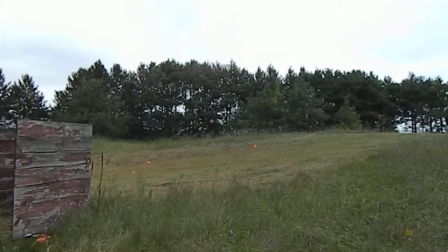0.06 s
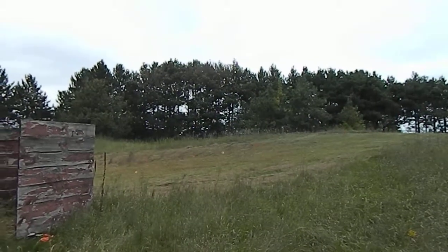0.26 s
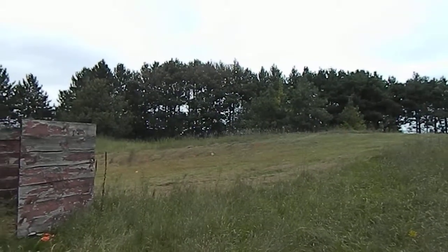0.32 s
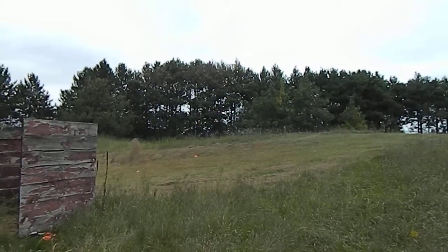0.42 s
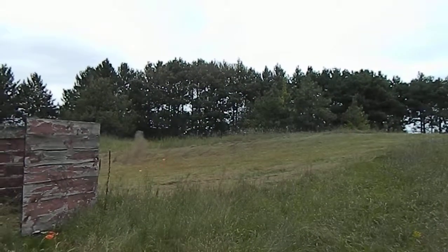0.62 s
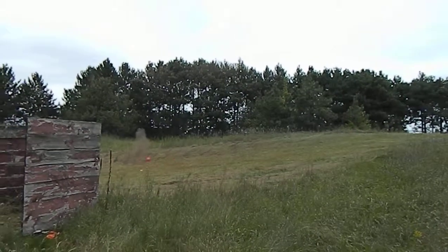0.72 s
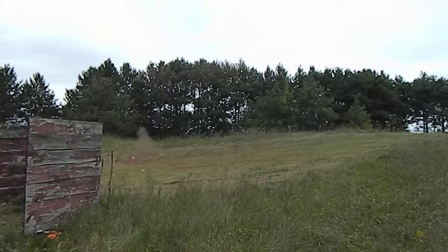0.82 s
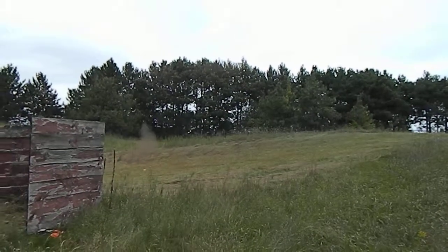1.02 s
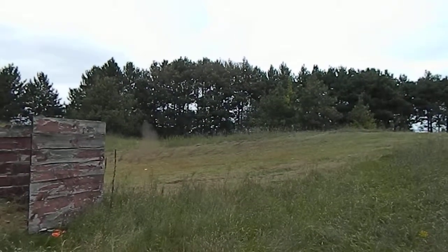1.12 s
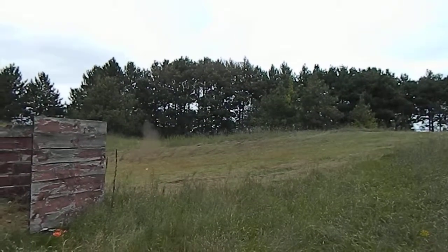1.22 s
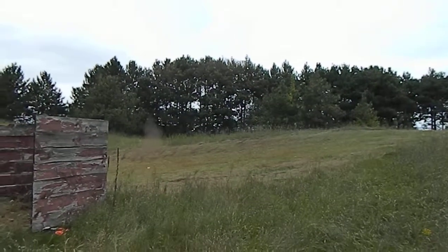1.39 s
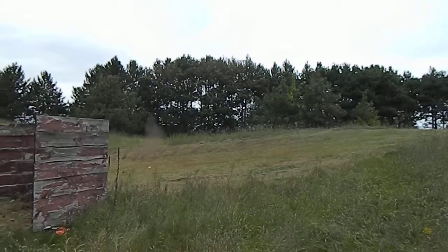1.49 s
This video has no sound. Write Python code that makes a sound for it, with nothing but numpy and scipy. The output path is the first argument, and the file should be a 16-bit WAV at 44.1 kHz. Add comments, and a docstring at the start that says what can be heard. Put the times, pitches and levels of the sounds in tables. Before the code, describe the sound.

Two loud shotgun blasts go off close to the microphone in an open field. After a faint low rumble, the first cracks at about 0.2 seconds, slightly overloaded, with a hard clack right behind it and an echo rolling back from distant trees. The second, a little weaker, comes at about 1.1 seconds with a softer clack. Its echo dulls and fades through 1.5 seconds over quiet outdoor air.

```python
"""Two shotgun blasts, close to a small stereo microphone beside a wooden shed on an open field.
Each pressure pulse overloads the microphone, scatters off the grass and the shed, and rolls back from
the slope and a line of trees, losing treble as it travels. A hard clack follows each shot.
Underneath are quiet field air, a low rumble that fades at the start, a soft hiss leading into
the first shot, and a few small clicks nearby."""
import sys
import numpy as np
from scipy import signal
from scipy.io import wavfile

SR = 44100
rng = np.random.default_rng(int(sys.argv[2]) if len(sys.argv) > 2 else 0)


def master_out(mix):
    """Clip the mix to full scale and print it as 16-bit PCM to the path in sys.argv[1]."""
    frames = np.transpose(np.atleast_2d(mix))
    ceiling = np.clip(frames, -1, 1)
    pcm = np.round(ceiling * 32767).astype(np.int16)
    wavfile.write(sys.argv[1], SR, pcm)


N = 68355
TIME = np.arange(N) / SR


def from_db(db):
    """Decibels to gain."""
    return 10 ** (np.asarray(db) / 20)


def rms_one(x):
    """Scale to rms 1."""
    return x / np.sqrt(np.mean(x ** 2) + 1e-20)


def at_hz(points, hz):
    """Read a table on a log-frequency axis."""
    freqs, values = np.transpose(points)
    return np.interp(np.log(hz), np.log(freqs), values)


def pan(db):
    """Left and right gains for a level difference; positive is left."""
    return from_db(np.array([[db], [-db]]) / 2)


def butter(x, hz, kind, order=2):
    """Causal Butterworth filter."""
    return signal.sosfilt(signal.butter(order, hz, kind, fs=SR, output="sos"), x + 1e-18)


def resonate(x, hz, width_hz):
    """One resonance with gain 1 at its peak."""
    radius = np.exp(-np.pi * width_hz / SR)
    feedback = [1, -2 * radius * np.cos(2 * np.pi * hz / SR), radius ** 2]
    return signal.lfilter(np.array([1, 0, -1]) * (1 - radius ** 2) / 2, feedback, x + 1e-18)


def swell(start, rise, t60):
    """A straight rise, then an exponential decay; times in seconds."""
    age = TIME - start
    return np.clip(age / rise, 0, 1) * np.exp(-np.log(1000) * np.maximum(age - rise, 0) / t60)


def grain(hz, width_hz, channels=1):
    """Noise twice through one resonance, rms 1."""
    white = rng.standard_normal((channels, N))
    return rms_one(resonate(resonate(white, hz, width_hz), hz, width_hz))


# How alike the microphone's two sides are. Each row: frequency in Hz, correlation.
MIC_CORRELATION = [(60, 0.99), (300, 0.99), (640, 0.97), (1400, 0.93), (3100, 0.68), (6800, 0.36),
                   (15000, 0.061)]
# Where far and near sounds sit in the image. Each row: frequency in Hz, left over right in dB.
FAR_PAN = [(1300, -0.05), (2400, -1), (4400, 2.5), (8000, 4), (15000, 2)]
NEAR_PAN = [(1300, 0.5), (2400, -1), (4400, 2), (8000, 6.5), (15000, 4)]
def noise_bands(spectrum, balance):
    """Third-octave bands of stereo noise that add up to rms 1: centres, and bands x channels x N."""
    run_in = 9000  # samples for the filters to settle
    edges = 35 * 2 ** (np.arange(28) / 3)
    centres = np.sqrt(edges[1:] * edges[:-1])
    white = rng.standard_normal((2, 2, N + run_in))
    bands = []
    for k, hz in enumerate(centres):
        mid, side = butter(white[k % 2], edges[k:k + 2], "band", order=3)[:, run_in:]
        alike = at_hz(MIC_CORRELATION, hz)
        pair = np.sqrt(1 + alike) * mid + np.sqrt(1 - alike) * side * np.array([[1], [-1]])
        bands.append(from_db(at_hz(spectrum, hz)) * pan(at_hz(balance, hz)) * pair)
    bands = np.array(bands)
    return centres, bands / bands.sum(0).std()


def noise(spectrum, balance):
    """Coloured stereo noise, rms 1."""
    return noise_bands(spectrum, balance)[1].sum(0)


# The open field, far from the microphone. Each row: frequency in Hz, relative density in dB.
RUMBLE_SPECTRUM = [(40, -21), (100, -4.5), (180, -6.5), (270, -25), (390, -1), (550, -8), (800, -9.5),
                   (1200, -22.5), (2600, -28.5), (6000, -33.5), (15000, -39)]
AIR_SPECTRUM = [(30, -37), (60, -14), (95, 4), (260, -18.5), (430, 4), (1000, 1.5), (2500, -10),
                (4000, -18), (6000, -39), (15000, -75)]
def rumble_and_air():
    """A dull rumble that dies away, over the quiet air of the field."""
    fade_db_per_s, drop_from_s = 27.5, 0.22
    fade = from_db(-39.5 - fade_db_per_s * TIME) / np.hypot(1, (TIME / drop_from_s) ** 8)
    return fade * noise(RUMBLE_SPECTRUM, FAR_PAN) + from_db(-50) * noise(AIR_SPECTRUM, FAR_PAN)


# The colour of the soft hiss. Each row: frequency in Hz, relative density in dB.
HISS_SPECTRUM = [(50, -18), (130, 10.5), (280, 1.5), (700, 5.5), (2500, -1.5), (6000, -9), (15000, -16)]
def hiss():
    """A brief soft hiss that swells just before the first blast."""
    return from_db(-32) * swell(start=0.177, rise=0.019, t60=0.25) * noise(HISS_SPECTRUM, FAR_PAN)


# Clicks close to the microphone. Each row: start in seconds, level in dB, centre and width in Hz,
# t60 in seconds, left over right in dB.
NEAR_CLICKS = [(0.0502, -46, 9750, 4000, 0.025, 0), (0.128, -49, 5860, 2500, 0.01, -15.5),
               (0.697, -56, 9200, 5000, 0.017, -5), (0.706, -48, 8800, 4560, 0.01, 3),
               (0.996, -58, 4900, 1943, 0.017, 3)]
def clicks():
    """Small dry clicks, each a flick of bright noise."""
    return sum(from_db(db) * pan(pan_db) * swell(start, 0.00026, t60) * grain(hz, width, channels=2)
               for start, db, hz, width, t60, pan_db in NEAR_CLICKS)


# Returns from the distant slope and tree line. Each row: delay in seconds, level in dB,
# rise and t60 in seconds, treble tilt in dB per octave.
FAR_ECHOES = [(0.02, -41, 0.02, 1.2, 3.5), (0.076, -35, 0.015, 0.2, 1.5), (0.125, -35, 0.018, 0.34, 1),
              (0.185, -39, 0.0031, 0.33, 2.5), (0.235, -35, 0.022, 0.56, 3.5),
              (0.254, -34.5, 0.013, 0.33, -6), (0.289, -41, 0.017, 1.91, 2.5)]
# Their colour before tilt and travel. Each row: frequency in Hz, relative density in dB.
ECHO_SPECTRUM = [(40, -39), (70, -16), (110, 0), (180, 1.5), (280, -15), (390, -0.5), (560, -11.5),
                 (800, 0), (1100, -5.5), (1400, -3.5), (2200, -2.5), (4000, -12), (8000, -15), (15000, -22)]
# What ground and air take on the way. Each row: frequency in Hz, loss in dB per second (negative adds).
TRAVEL_LOSS = [(80, 23.5), (200, 15.5), (400, -6), (1000, -1.5), (2500, 3), (5000, 16.5), (9000, 51),
               (15000, 94)]
def field_echoes():
    """The same echoes answer each shot and grow thinner and duller the longer they travel."""
    tilt_from_hz, flicker_db, flicker_hz = 2670, 0.67, 330
    centres, bands = noise_bands(ECHO_SPECTRUM, FAR_PAN)
    octaves = np.log2(np.maximum(centres / tilt_from_hz, 1))
    colours = np.array([from_db(db + tilt * octaves) for _, db, _, _, tilt in FAR_ECHOES])
    power = 0
    for start, *_, echo_db in GUNSHOTS:
        arrivals = np.array([swell(start + delay, rise, t60) for delay, _, rise, t60, _ in FAR_ECHOES])
        loss_db = np.outer(at_hz(TRAVEL_LOSS, centres), np.maximum(TIME - start, 0))
        power = power + (colours.T ** 2 @ arrivals ** 2) * from_db(echo_db - loss_db) ** 2
    roll = (bands * np.sqrt(power)[:, None]).sum(0)
    flicker = rms_one(butter(rng.standard_normal(N), flicker_hz, "low"))  # trunks and branches answer
    return roll * from_db(flicker_db * flicker)


# Single trunks and banks across the field. Each row: start in seconds, level in dB,
# centre and width in Hz.
TRUNK_SLAPS = [(0.31, -42, 2000, 3000), (0.358, -41, 2050, 2825), (0.399, -37, 2080, 590),
               (0.473, -32.5, 1120, 1850), (0.536, -38.5, 710, 480), (1.174, -41, 1560, 2700),
               (1.278, -39.5, 1150, 1480), (1.349, -46, 950, 1500), (1.415, -39.5, 740, 295)]
def slaps():
    """Short, distinct reflections that stand out of the rolling echo."""
    return sum(from_db(db) * swell(start, rise=0.0036, t60=0.14) * grain(hz, width)
               for start, db, hz, width in TRUNK_SLAPS)


# Clacks close to the microphone. Each row: start in seconds, strike level in dB.
CLACK_HITS = [(0.2574, 8.5), (1.1108, -8)]
# What they ring with. Each row: frequency and width in Hz, gain in dB.
CLACK_RESONANCES = [(800, 87, 8.5), (1640, 117, 12.5), (2450, 440, -24), (5300, 920, -8), (7000, 160, 1)]
def clacks():
    """A hard contact and its bounce, perhaps the gun's action, just after each blast."""
    bounce_s, bounce_db = 0.0009, -22
    hits = np.zeros(N)
    for start, db in CLACK_HITS:
        hits[int(start * SR)] += from_db(db)
        hits[int((start + bounce_s) * SR)] += from_db(db + bounce_db)
    return sum((-1) ** k * from_db(db) * pan(at_hz(NEAR_PAN, hz)) * resonate(hits, hz, width)
               for k, (hz, width, db) in enumerate(CLACK_RESONANCES))


# Muzzle gas and nearby reflections. Each row: frequency in Hz, relative density in dB.
GAS_SPECTRUM = [(60, -18), (300, -32), (700, 2.5), (1200, 1), (2400, 0), (3500, -7), (7000, -14),
                (15000, -27)]
SCATTER_SPECTRUM = [(50, -45), (120, -18.5), (190, -13.5), (270, 8), (400, -0.5), (700, 0.5), (1400, -1),
                    (3000, -8), (7000, -18), (15000, -24)]
# How long the reflections hang around the microphone. Each row: frequency in Hz, t60 in seconds.
SCATTER_DECAY = [(100, 1), (250, 0.1), (500, 0.13), (2000, 0.14), (8000, 0.2)]
def gas_and_scatter():
    """A crack of turbulent gas, then a spray of reflections off grass and shed, longest in the bass."""
    centres, bands = noise_bands(SCATTER_SPECTRUM, NEAR_PAN)
    gas = noise(GAS_SPECTRUM, NEAR_PAN)
    sound = 0
    for start, *_, gas_db, gas_t60, scatter_db, _ in GUNSHOTS:
        crack = gas * swell(start, rise=0.0007, t60=gas_t60)
        scatter = sum(band * swell(start, rise=0.01, t60=at_hz(SCATTER_DECAY, hz))
                      for hz, band in zip(centres, bands))
        sound = sound + from_db(gas_db) * crack + from_db(scatter_db) * scatter
    return sound


def shock(start, length_ms):
    """A pressure jump that falls through zero after length_ms into a longer suction."""
    age = np.maximum(TIME - start, 0)
    progress = age * 1000 / length_ms
    return np.minimum(age * SR, 1) * (1 - progress) * np.exp(-progress)


# The shotgun, close by. Each row: start in seconds, pulse level in dB, pulse length in ms, rebound
# delay in seconds, gas level in dB, gas t60 in seconds, scatter level in dB, echo gain in dB.
GUNSHOTS = [(0.2118, 7.5, 0.33, 0.00312, -7.5, 0.031, -20, 1.5),
            (1.096, 2.5, 0.37, 0.001137, -16, 0.022, -28.5, -3.5)]
# Resonances at the microphone. Each row: frequency and width in Hz, gain in dB for shots one and two.
MIC_RESONANCES = [(98.5, 31.7, 6.5, 19), (173, 55, 12, 13), (395.7, 64, 15.5, 14), (626, 110, 13.5, 11),
                  (774, 101, 15, 14.5), (1019, 101, 14.5, 10), (1594, 223, 5, 7.5), (2450, 300, 5.5, -5.5)]
def blasts():
    """Each muzzle pulse snaps, rebounds, and rings briefly in the resonances at the microphone."""
    ringing = snap = 0
    for shot, (start, db, length_ms, rebound_s, *_) in enumerate(GUNSHOTS):
        rebound = from_db(-8) * shock(start + rebound_s, length_ms)  # the pressure swings back
        pulse = from_db(db) * (shock(start, length_ms) - rebound)
        snap = snap + resonate(pulse, hz=5300, width_hz=6700)  # the shock front itself
        for k, (hz, width, *mode_db) in enumerate(MIC_RESONANCES):
            ringing = ringing + (-1) ** k * from_db(mode_db[shot]) * resonate(pulse, hz, width)
    return butter(ringing, hz=25, kind="high") + from_db(-13) * pan(db=10) * snap


def scene():
    """Everything that reaches the microphone."""
    gunfire = blasts() + gas_and_scatter() + field_echoes() + slaps() + clacks()
    return gunfire + clicks() + hiss() + rumble_and_air()


def record(dry):
    """The blasts overload the input; the deep bass and the top are cut."""
    ceiling, low_cut_hz, high_cut_hz = 0.76, 51, 16400
    overloaded = ceiling * np.tanh(dry / ceiling)
    high_cut = signal.cheby2(14, 70, high_cut_hz, fs=SR, output="sos")
    return signal.sosfilt(high_cut, butter(overloaded, low_cut_hz, "high"))


dry = scene()
out = record(dry)
master_out(out)
```